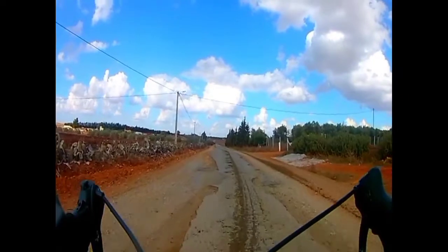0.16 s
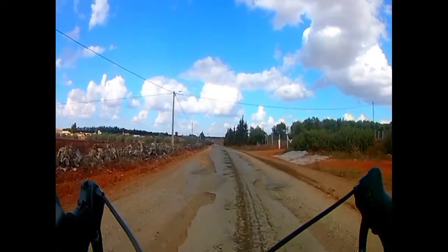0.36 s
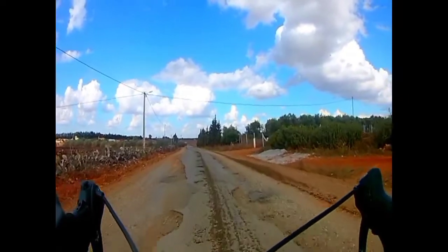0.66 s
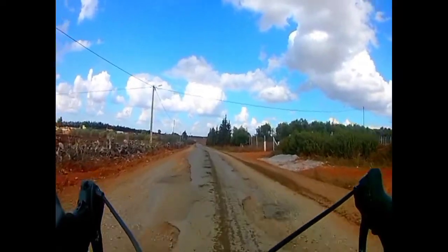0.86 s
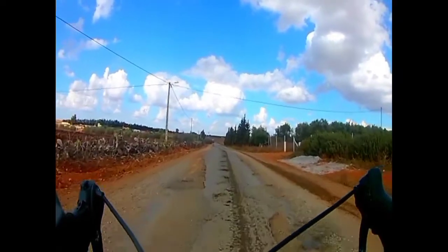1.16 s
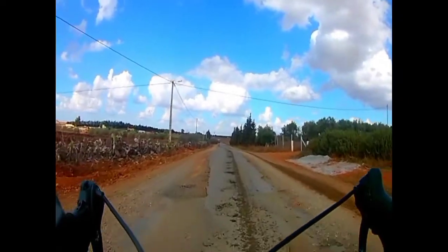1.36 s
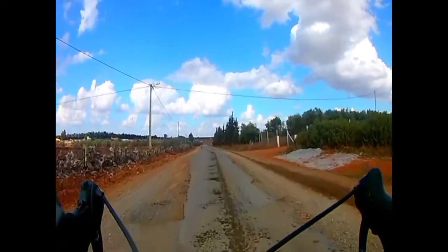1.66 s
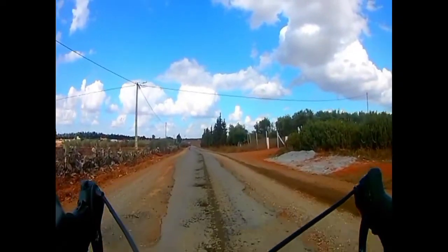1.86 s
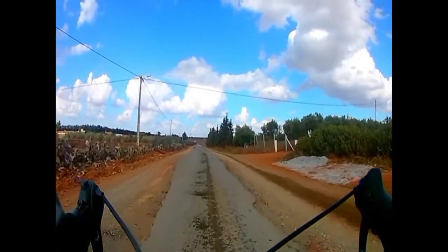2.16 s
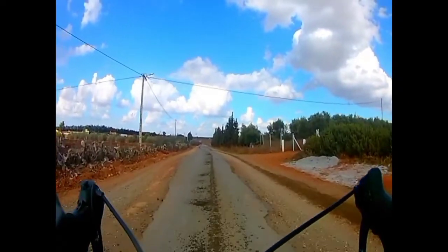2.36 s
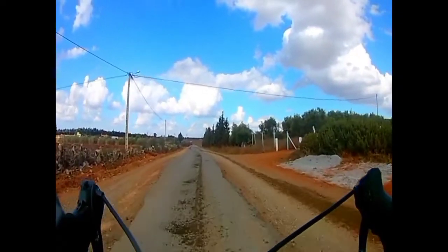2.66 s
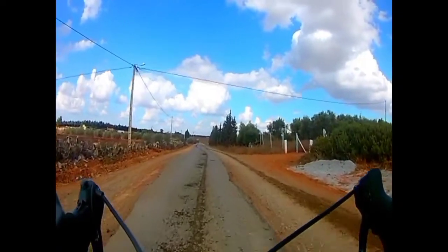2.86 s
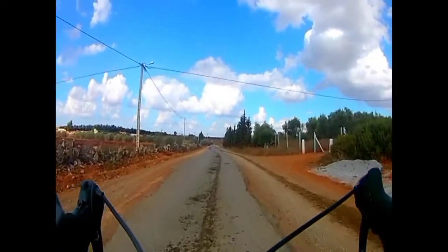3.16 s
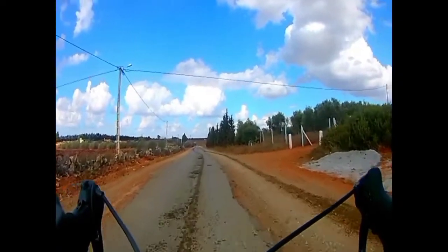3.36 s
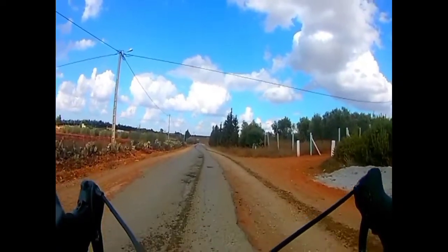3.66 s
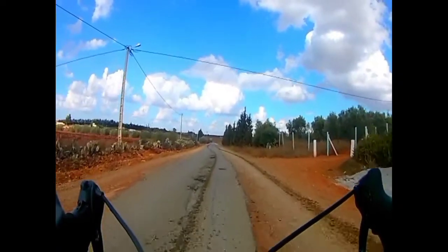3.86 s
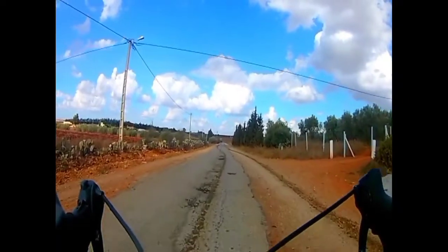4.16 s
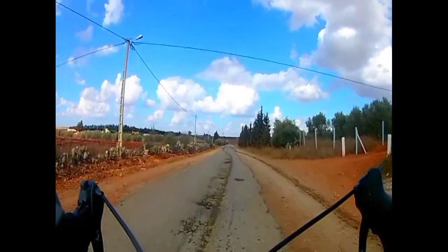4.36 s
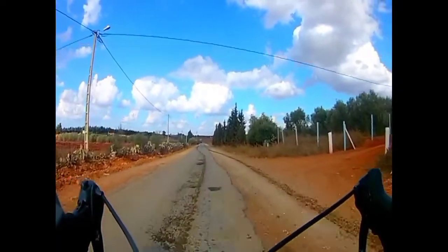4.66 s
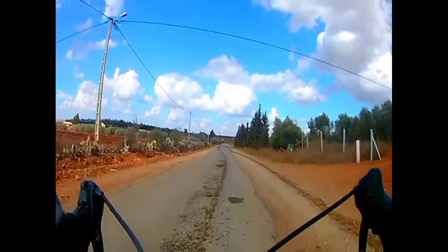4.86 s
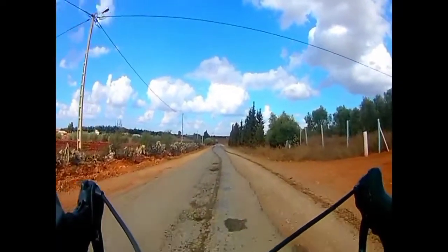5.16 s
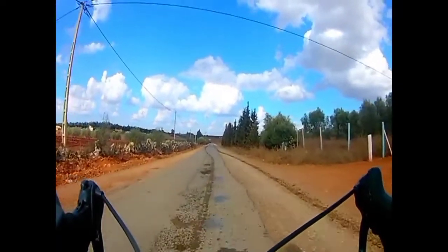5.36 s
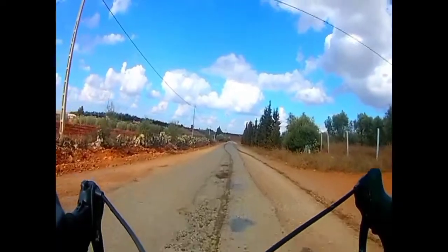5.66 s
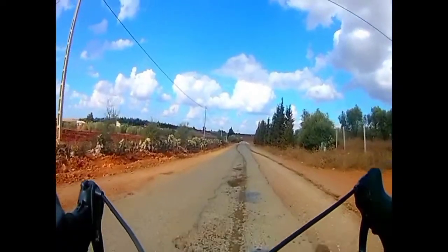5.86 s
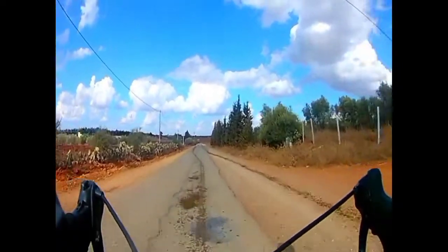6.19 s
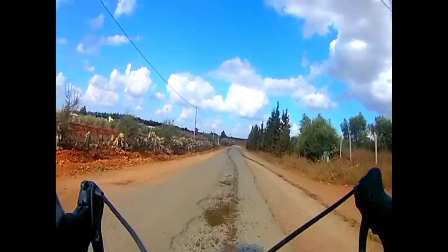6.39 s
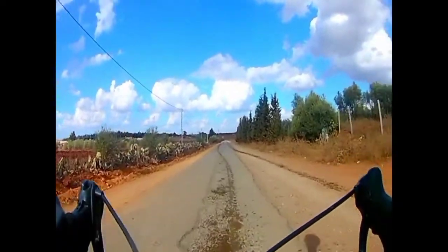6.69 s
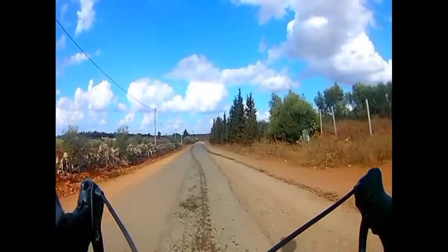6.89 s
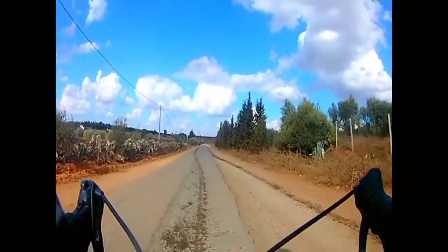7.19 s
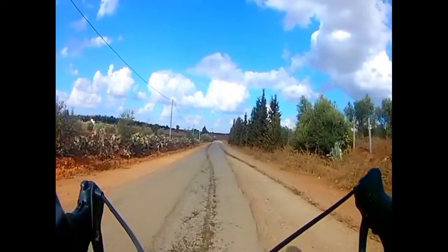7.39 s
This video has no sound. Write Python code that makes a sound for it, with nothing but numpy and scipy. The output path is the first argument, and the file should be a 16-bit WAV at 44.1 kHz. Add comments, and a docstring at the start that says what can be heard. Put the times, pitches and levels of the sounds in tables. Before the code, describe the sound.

Gritty tyre noise, a low throbbing vibration and gusts of wind run throughout, picked up on the handlebar of a bicycle riding over coarse asphalt. At first there are light knocks and quiet freewheel ticking. The ticking fades for about two seconds as the chain runs faintly, then comes back quicker. The second half is bumpier, with frequent thuds, sharp clacks and an occasional metallic chain slap.

```python
"""A road bicycle on rough asphalt, heard close up from a camera microphone fixed to its handlebar.
The road crackles through the frame and shakes the bar into a low drone, while air buffets the microphone.
Back at the rear wheel the freewheel ticks, fades under the chain during a spell of pedalling, then
ticks faster. Pebbles and bumps knock the frame, clack a loose fitting and now and then slap the chain."""
import sys
import numpy as np
from scipy import signal
from scipy.fft import rfft, irfft
from scipy.io import wavfile
from scipy.ndimage import uniform_filter1d

SR = 44100
rng = np.random.default_rng(int(sys.argv[2]) if len(sys.argv) > 2 else 0)


def digitize_waveform(pressure):
    """Quantize a signal to 16-bit integers and store it at the path in sys.argv[1].

    Rows of a 2-D input are taken as channels; values are limited to [-1, 1].
    """
    field = np.atleast_2d(pressure).T
    bounded = np.clip(field, -1, 1)
    quanta = np.round(bounded * 32767).astype(np.int16)
    wavfile.write(sys.argv[1], SR, quanta)


N = 332073
TIME = np.arange(N) / SR


def amp(db):
    """Decibels to gain."""
    return 10 ** (np.asarray(db) / 20)


def unit(x):
    """Scales to rms 1."""
    return x / np.sqrt(np.mean(x ** 2) + 1e-20)


def unit_peak(x):
    """Scales a hit so that its loudest two milliseconds have rms 1."""
    return x / np.sqrt(uniform_filter1d(x ** 2, size=88).max() + 1e-20)


def curve(rows):
    """Joins (time, value) points into a value at every sample."""
    return np.interp(TIME, *np.transpose(rows))


def add(mix, s, sound):
    """Lays a sound into the mix at s seconds."""
    part = mix[max(round(s * SR), 0):][:len(sound)]
    part += sound[:len(part)]


def wander(rate_hz):
    """Slow random motion of rms 1."""
    hz = np.fft.rfftfreq(N, 1 / SR)
    return unit(irfft(rfft(rng.standard_normal(N)) * np.exp(-(hz / rate_hz) ** 2), N))


def response(spectrum, resonances=(), size=8192):
    """Causal impulse response of a (frequency [Hz], level [dB]) spectrum with resonant humps."""
    hz = np.fft.rfftfreq(size, 1 / SR)
    points_hz, level = np.transpose(spectrum)
    db = np.interp(np.log(hz + 1), np.log(points_hz), level)
    db -= 40 * np.log10(np.maximum(hz / points_hz[-1], 1))  # 12 dB an octave above the last point
    for centre, width, lift in resonances:
        db += lift / (1 + (2 * (hz - centre) / width) ** 2)
    log_gain = np.log(amp(np.r_[db, db[-2:0:-1]]))
    minimum_phase = np.exp(np.conj(signal.hilbert(log_gain)))
    return np.fft.ifft(minimum_phase).real[:size // 2]


def through(x, taps):
    """Passes a signal through an impulse response."""
    return signal.fftconvolve(x, taps)[:len(x)]


def strike(body, rise_s, t60_s, size=3000):
    """Touching parts chatter in a burst that swells, dies away and sounds a body's impulse response."""
    return unit_peak(through(contact(rise_s, t60_s, size), body))


def contact(rise_s, t60_s, size=3000):
    """The noisy force between two parts as they meet and come to rest."""
    t = np.arange(size) / SR
    return rng.standard_normal(size) * (1 - np.exp(-t / rise_s)) * amp(-60 * t / t60_s)


# Coarseness of the asphalt under the wheels (time [s], level [dB])
ROAD_COARSENESS = [(0.0, -36.5), (0.88, -40), (1.4, -37.5), (1.74, -36.5), (2.22, -37), (2.49, -34.5),
                   (4.3, -32.5), (4.51, -34), (4.74, -33.5), (5.12, -32.5), (5.41, -35.5), (6.17, -33),
                   (7.0, -33.5), (7.53, -33.5)]
# Tyre noise as it arrives at the handlebar (frequency [Hz], level [dB])
TYRE_SPECTRUM = [(60, -12.5), (170, 3.5), (280, -3), (430, 4.5), (620, -5), (830, -3.5), (1080, -17),
                 (1450, -10), (1950, -28), (2950, -44.5), (3950, -35.5), (4500, -50), (6000, -56),
                 (8000, -69)]
# Peaks and dips of the frame between road and microphone (frequency [Hz], width [Hz], lift [dB])
FRAME_RESONANCES = [(222, 14, -4), (400, 14, 1.5), (743, 140, 8), (1700, 34, 8), (2730, 71, -6.5),
                    (3440, 310, 4.5), (4030, 460, 7)]

def tyres(level_db=-0.38, stones_per_s=130, stone_db=-4.5, spread_db=2.5, flutter_db=1.77,
          patchy_db=1.36, bump_db=-23):
    """Asphalt grain and stone chips drive the frame from below, harder where a bump loads the tyre."""
    sizes = amp(spread_db * np.minimum(rng.exponential(1, N), 4)) * rng.choice([-1, 1], N)
    stones = sizes * (rng.random(N) < stones_per_s / SR)
    force = rng.standard_normal(N) + amp(stone_db) * unit(stones)
    force *= amp(flutter_db * wander(54))
    frame = through(force, response(TYRE_SPECTRUM, FRAME_RESONANCES))
    midrange = signal.sosfilt(signal.butter(4, [300, 1000], "band", fs=SR, output="sos"), frame)
    rolling = amp(curve(ROAD_COARSENESS) + level_db + patchy_db * wander(3.7))
    bump_load = amp(bump_db) * heave(rise_s=0.0093, fall_s=0.087)
    return frame / midrange.std() * np.hypot(rolling, bump_load)


BAR_HZ = 111.45
# Irregular shaking of the bar around its resonance (frequency [Hz], level [dB])
JUDDER_SPECTRUM = [(40, -21.5), (95, 2.0), (135, 8.0), (170, -6.5), (400, -35.0)]

def handlebar(drift_hz=7, flutter_db=2.5, road_db=-24, follow=.45, throb_db=5, bump_db=-1.0,
              octave_db=-19, judder_db=-10.0):
    """The bar resonates right under the microphone: the road keeps it throbbing, bumps throw it wide."""
    phase = 2 * np.pi * np.cumsum(BAR_HZ + drift_hz * wander(31.7)) / SR
    road = curve(ROAD_COARSENESS)
    throb = unit(amp(throb_db * np.minimum(wander(22), .9)))
    throb *= amp(road_db + follow * (road - road.mean()))
    reach = np.hypot(throb, amp(bump_db) * heave(rise_s=0.028, fall_s=0.022))
    # wide swings are lopsided, which adds the octave
    swing = np.sin(phase) + amp(octave_db) * np.sqrt(unit(reach)) * np.sin(2 * phase)
    judder = unit(through(rng.standard_normal(N), response(JUDDER_SPECTRUM)))
    drone = unit(swing * amp(flutter_db * wander(35)))
    return (drone + amp(judder_db) * judder) * reach


# Gusts head-on at the microphone (time [s], level [dB])
WIND_GUSTS = [(0, -33.5), (0.8, -30.5), (1.4, -33.5), (2.1, -29), (2.65, -28), (3.2, -29), (3.5, -24.5),
              (3.9, -33.5), (4.27, -23), (4.75, -33), (5.05, -29), (5.5, -32.5), (5.72, -22.5), (6.0, -34),
              (6.28, -25), (6.8, -31), (7.2, -35), (7.4, -19.5), (7.53, -35)]
# Rumble of the air on the microphone (frequency [Hz], level [dB])
WIND_SPECTRUM = [(8, -28), (22, -9), (45, -3), (70, -8), (110, -2.5), (200, -21), (600, -49.5)]

def wind(level_db=2.5, bump_db=-18):
    """Low turbulence right at the microphone, which surges as bumps jerk the camera."""
    rumble = unit(through(rng.standard_normal(N), response(WIND_SPECTRUM)))
    surge = amp(bump_db) * heave(rise_s=0.034, fall_s=.06)
    return rumble * np.hypot(amp(curve(WIND_GUSTS) + level_db), surge)


# Speed of the rear wheel (time [s], speed [turns/s])
WHEEL_SPEED = [(0, 2.08), (2.2, 1.93), (4.2, 2.48), (4.8, 2.5), (7.53, 2.18)]
# Freewheel, a bike's length behind the microphone, fading during pedalling (time [s], level [dB])
FREEWHEEL_LEVEL = [(0, -59), (2.2, -60), (2.4, -68), (4.45, -88), (4.7, -60.5), (6, -59.5), (7.53, -58)]

def rear_wheel(ticks_per_turn=15, tick_db=5, uneven_db=1.0, jitter_s=0.004, pawl_lag_s=0.0067,
               ping_hz=5230, ping_db=-71, ping_turn=.25):
    """Two pawls take turns dropping over the ratchet; something metal pings faintly once a turn."""
    out, level = np.zeros(N), curve(FREEWHEEL_LEVEL)
    turns = np.cumsum(curve(WHEEL_SPEED)) / SR
    drops = np.flatnonzero(np.diff(np.floor(turns * ticks_per_turn)))
    for k, at in enumerate(drops):
        late, strong = rng.standard_normal(2)
        tick = amp(level[at] + tick_db + uneven_db * strong) * clink(rise_s=0.0012, scrape_t60_s=0.017)
        add(out, at / SR + jitter_s * late + pawl_lag_s * (k % 2), tick)
    for at in np.flatnonzero(np.diff(np.floor(turns - ping_turn))):
        gain = amp(ping_db + uneven_db * rng.standard_normal())
        add(out, at / SR, gain * ring([(ping_hz, 0, .08)], spread_db=0))
    return out


# Ringing metal of the drivetrain (frequency [Hz], level [dB], time to fall 60 dB [s])
DRIVETRAIN_MODES = [(2628, 1.5, 0.018), (3220, -14, 0.052), (3550, 1, 0.02), (3864, 6.5, 0.016),
                    (4140, -1, 0.028), (4630, -16.5, 0.0099), (5590, -9.5, .018), (6200, -12.5, 0.019),
                    (6424, -12, 0.036), (6720, -14.5, 0.022), (7460, -21, 0.015), (8690, -23, 0.027)]

def clink(rise_s, scrape_t60_s):
    """A small metal part lands on the drivetrain and scrapes to rest."""
    return unit_peak(through(ring(DRIVETRAIN_MODES, spread_db=2), contact(rise_s, scrape_t60_s)))


def ring(modes, spread_db, rise_s=0.00036, size=4000):
    """Struck metal: each blow shares its energy a little differently among the modes."""
    out, t = np.zeros(size), np.arange(size) / SR
    for hz, db, t60_s in modes:
        decay = amp(db + spread_db * rng.standard_normal() - 60 * t / t60_s)
        out += decay * np.sin(2 * np.pi * (hz * t + rng.random()))
    return unit_peak(out * (1 - np.exp(-t / rise_s)))


# Stones and cracks in the road (time [s], bar swing [dB], thud [dB], knock [dB], clack [dB])
ROAD_BUMPS = [(0.4241, -22.5, -24, -37, -58), (0.4899, -23.5, -25, -31.5, -66),
              (0.8396, -23, -25.5, -27.5, -60), (1.6319, -17, -31, -36, -53), (1.909, -20.5, -31, -42, -54),
              (2.408, -24, -22.5, -27.5, -52), (2.6363, -20, -21.5, -29.5, -31.5),
              (3.0416, -14.5, -21, -21, -20.5), (3.2039, -24.5, -21, -27.5, -51),
              (3.369, -15, -22, -42, -37.5), (3.4761, -9.5, -20, -27, -24), (3.503, -23.5, -20, -26, -56),
              (3.5658, -22.5, -23.5, -32, -55), (4.2818, -8, -22.5, -26, -26.5),
              (4.3078, -18.5, -23.5, -39, -45.5), (4.4762, -13, -23, -29, -35.5),
              (4.5696, -10.5, -22, -38, -37.5), (4.7239, -25, -21.5, -31, -55),
              (5.04, -20, -17, -28.5, -31), (5.072, -12, -31, -33.5, -28.5), (5.128, -24, -25, -31, -56),
              (5.235, -12, -16.5, -25.5, -28), (5.442, -12.5, -25, -20.5, -43),
              (5.655, -20, -27, -27.5, -34.5), (5.713, -22, -16.5, -29.5, -30.5),
              (5.7436, -16.5, -23, -25.5, -34.5), (5.888, -7.5, -25.5, -34, -34),
              (5.9948, -17.5, -31, -28, -51), (6.104, -19.5, -28, -31, -50),
              (6.1295, -17.5, -18.5, -37, -35.5), (6.1842, -7.5, -24, -20, -28),
              (6.28, -16, -22.5, -28, -40), (6.534, -11, -31, -31, -36.5), (6.553, -15.5, -30, -26.5, -32),
              (6.719, -19, -23, -27.5, -43.5), (7.187, -12, -19.5, -29, -29),
              (7.3838, -12.5, -17.5, -22, -28), (7.41, -18, -39, -32.5, -37.5)]
# Dull thud of the frame, heard through the bar (frequency [Hz], level [dB])
THUD_SPECTRUM = [(60, -21), (150, -11.5), (290, 0), (420, 0), (560, 1), (800, -10), (1100, -14),
                 (2500, -48)]
# Harder knock of the frame (frequency [Hz], level [dB])
KNOCK_SPECTRUM = [(400, -7.5), (1000, -11), (1400, 9), (1750, -9.5), (2300, -20.5), (3000, -30),
                  (3900, -23.5), (4700, -34), (8000, -58.5)]
# Bright clack of a loose fitting (frequency [Hz], level [dB])
CLACK_SPECTRUM = [(300, -9), (1200, 6.5), (2050, 8), (2700, -6.5), (3500, -1), (4500, -0.5), (5500, -10.5),
                  (6300, -20), (7300, -21.5), (8100, -44), (9500, -37.5), (15000, -47)]
# The chain slapping metal, behind the microphone (time [s], level [dB])
CHAIN_SLAPS = [(3.0395, -31), (5.439, -29.5), (6.1832, -32)]

def rattles(knock_trim_db=-4, slap_trim_db=-6, clack_lag_s=.001, double_above_db=-27, first_touch_db=-2):
    """Bumps thud and knock in the frame, clack a loose fitting and now and then throw the chain."""
    out = np.zeros(N)
    thud, knock = response(THUD_SPECTRUM, FRAME_RESONANCES), response(KNOCK_SPECTRUM, FRAME_RESONANCES)
    clack = response(CLACK_SPECTRUM)
    for s, _, thud_db, knock_db, clack_db in ROAD_BUMPS:
        touches = [(s, 0)]
        if clack_db > double_above_db:  # a hard hit also touches softly one swing of the bar earlier
            touches.append((s - 1 / BAR_HZ, first_touch_db))
        for at, db in touches:
            add(out, at, amp(knock_db + knock_trim_db + db) * strike(knock, rise_s=0.014, t60_s=0.02))
            add(out, at, amp(thud_db + db) * strike(thud, rise_s=0.00072, t60_s=0.032))
            add(out, at + clack_lag_s, amp(clack_db + db) * strike(clack, rise_s=0.00067, t60_s=.005))
    for s, db in CHAIN_SLAPS:
        add(out, s, amp(db + slap_trim_db) * clink(rise_s=0.0036, scrape_t60_s=0.033))
    return out


# Smooth dips in the road that swing the bar without a knock (time [s], bar swing [dB])
ROAD_DIPS = [(0.73, -16.5), (0.972, -17), (2.039, -14.5), (2.86, -16.5), (3.33, -15), (3.75, -14.5),
             (4.051, -13.5), (4.94, -14.5), (5.329, -14.5), (5.94, -12.5), (6.66, -15.5)]

def heave(rise_s, fall_s):
    """How hard bumps and dips throw the bicycle: each swells up to its moment and dies away."""
    power, t = np.zeros(N), np.arange(-.3, .8, 1 / SR)
    shape = np.exp(-np.where(t < 0, (t / rise_s) ** 2, t / fall_s))
    for s, swing_db, *_ in ROAD_BUMPS + ROAD_DIPS:
        add(power, s + t[0], (amp(swing_db) * shape) ** 2)
    return np.sqrt(power)


def pebbles(count=18, level_db=-1, knock_db=-1, click_db=-17, uneven_db=2.0):
    """Small stones knock the frame at random, more often and louder where the road is coarse."""
    out, road = np.zeros(N), curve(ROAD_COARSENESS)
    frame = unit(response(THUD_SPECTRUM, FRAME_RESONANCES))
    frame += amp(knock_db) * unit(response(KNOCK_SPECTRUM, FRAME_RESONANCES))
    click = response(CLACK_SPECTRUM)
    road_energy = np.cumsum(amp(road) ** 2)
    shares = (np.arange(count) + rng.random(count)) / count  # one stone in each equal share of energy
    for at in np.searchsorted(road_energy, shares * road_energy[-1]):
        tap = strike(frame, rise_s=0.005, t60_s=0.058)
        tap += amp(click_db) * strike(click, rise_s=.0008, t60_s=0.0057)
        add(out, at / SR, amp(road[at] + level_db + uneven_db * rng.standard_normal()) * tap)
    return out


def fitting_chatter(chance=.3, loose_above_db=-21, level_db=-34, uneven_db=2):
    """While the bar swings wide, the loose fitting taps its stop lightly on some of the swings."""
    out, clack = np.zeros(N), response(CLACK_SPECTRUM)
    reach = heave(rise_s=.025, fall_s=.04)
    swings = np.arange(0, N, SR / BAR_HZ).astype(int)
    for at, luck, strong in zip(swings, rng.random(len(swings)), rng.standard_normal(len(swings))):
        if luck < chance and reach[at] > amp(loose_above_db):
            tap = strike(clack, rise_s=0.00092, t60_s=0.0077)
            add(out, at / SR, reach[at] * amp(level_db + uneven_db * strong) * tap)
    return out


# Chain running under load, below and behind the microphone (time [s], level [dB])
CHAIN_LEVEL = [(0, -89), (2.2, -88.5), (2.45, -62), (4.4, -61), (4.7, -89), (7.53, -91)]

def chain(start_s=2.2, end_s=4.7, links_per_s=70, uneven_db=2, jitter_s=0.0049):
    """Rollers seat on the teeth and ring the drivetrain in a faint, uneven patter."""
    out, level = np.zeros(N), curve(CHAIN_LEVEL)
    links = np.arange(start_s, end_s, 1 / links_per_s)
    for s, (late, strong) in zip(links, rng.standard_normal((len(links), 2))):
        gain = amp(level[round(s * SR)] + uneven_db * strong)
        add(out, s + jitter_s * late, gain * clink(rise_s=0.0018, scrape_t60_s=0.014))
    return out


def scene():
    """Everything reaches the one microphone through the bar or the air around it."""
    mix = tyres() + handlebar() + wind() + rattles() + fitting_chatter() + pebbles()
    return (mix + rear_wheel() + chain())[None]


def record(dry, hiss_db=-82, ceiling=.8, cutoff_hz=15600):
    """The camera microphone adds faint hiss, rounds the largest swings and loses the highest treble."""
    noisy = dry + amp(hiss_db) * rng.standard_normal(dry.shape)
    rounded = noisy / (1 + (noisy / ceiling) ** 6) ** (1 / 6)
    faded = rounded * signal.windows.tukey(N, .001)
    lowpass = signal.firwin(511, cutoff_hz, window=("kaiser", 9), fs=SR)
    return signal.oaconvolve(faded, lowpass[None], "same")


dry = scene()
out = record(dry)
digitize_waveform(out)
```